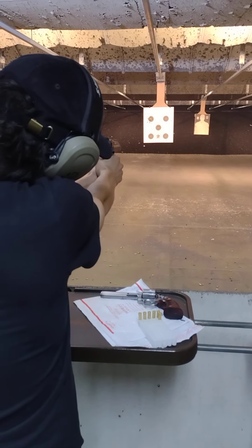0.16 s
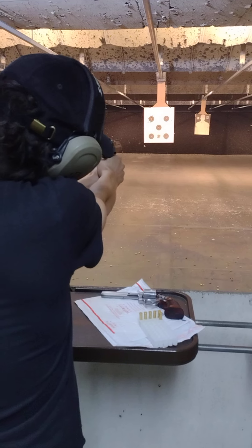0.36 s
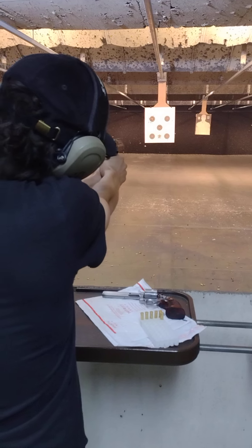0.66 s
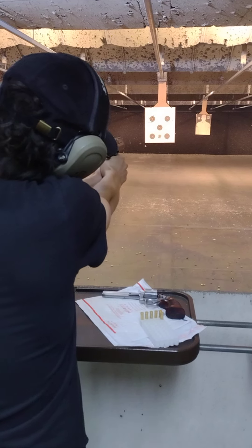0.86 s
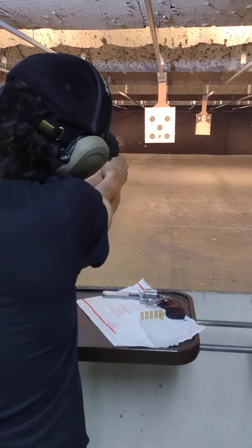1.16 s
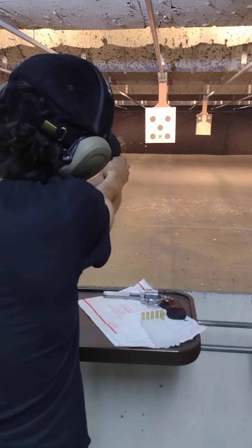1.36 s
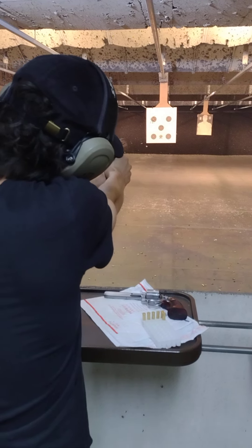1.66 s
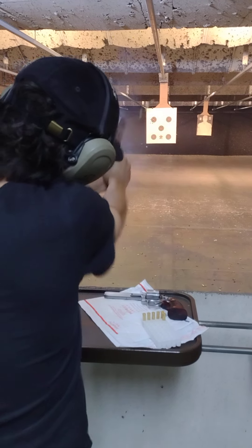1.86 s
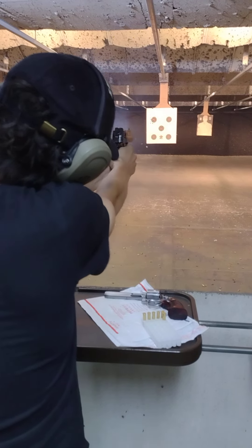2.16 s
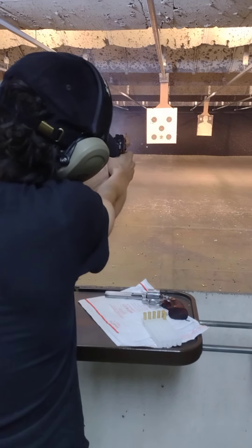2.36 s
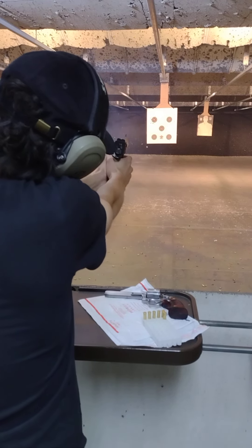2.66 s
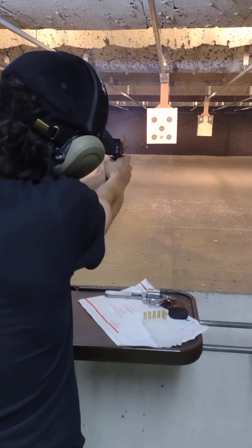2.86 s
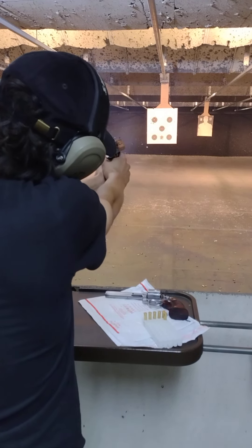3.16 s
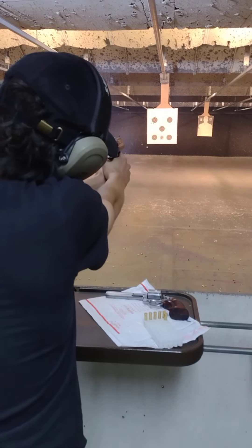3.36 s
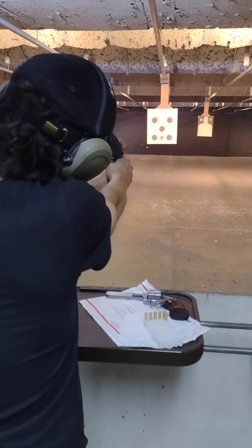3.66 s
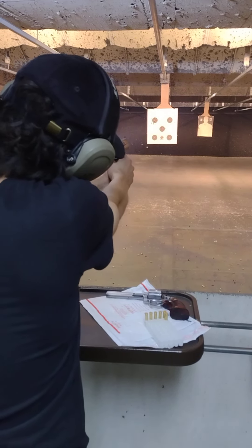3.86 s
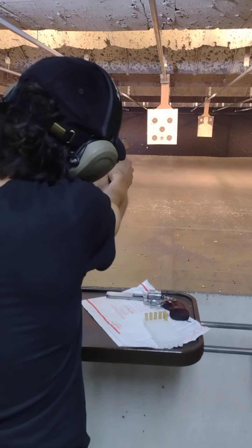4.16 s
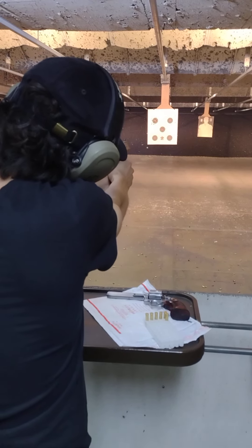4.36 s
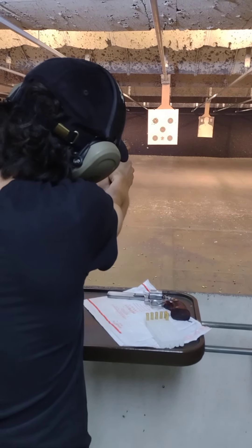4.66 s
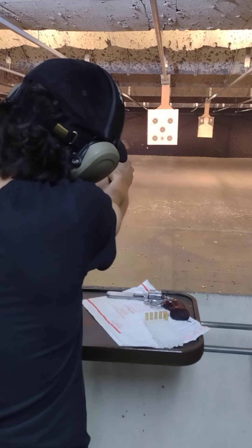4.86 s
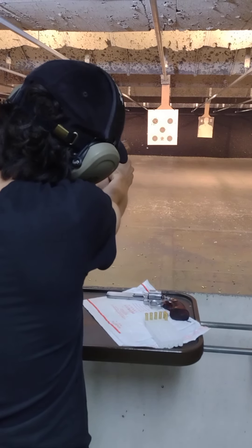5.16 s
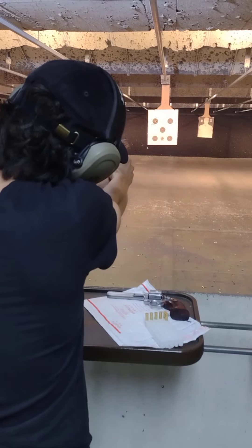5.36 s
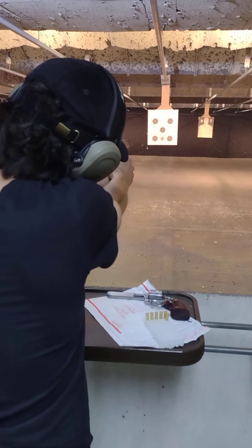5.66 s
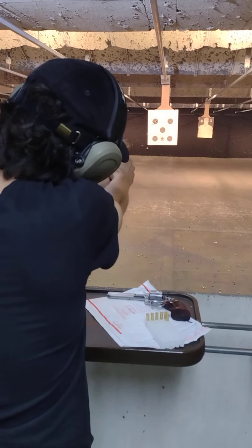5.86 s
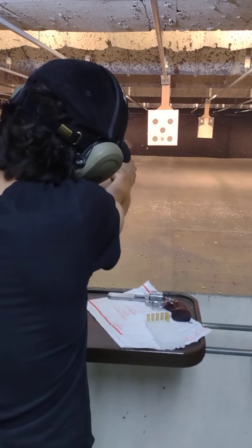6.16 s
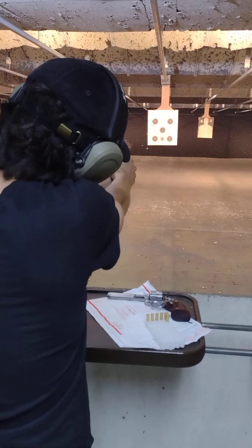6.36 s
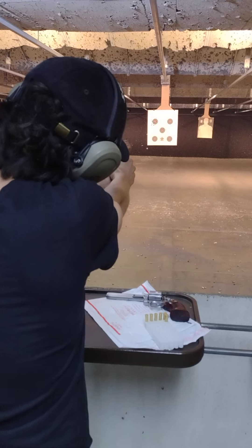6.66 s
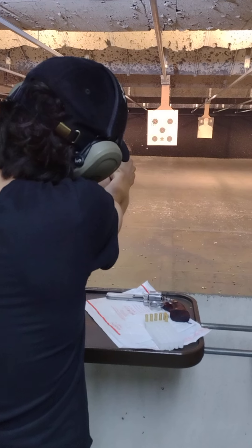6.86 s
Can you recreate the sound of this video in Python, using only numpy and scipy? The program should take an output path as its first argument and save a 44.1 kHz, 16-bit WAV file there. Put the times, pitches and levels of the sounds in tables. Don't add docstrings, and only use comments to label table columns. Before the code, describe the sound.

A long concrete indoor range, captured near the shooter in wide stereo. From 0 to 1.9 s there is low ventilation rumble, with small distant steel clinks around 0, 0.2, 0.4, 0.65, 1.0 and 1.7 s, a dull thud at 0.2 s and soft cloth and foot shifts from 1 s. At 1.94 s a bright, hissy handgun blast bursts out and holds as a dense roar, treble fading before hollow midrange ringing. Faint tinkles come near 2.5 s; a brass case strikes and rings at 2.8 s, rebounds at 3.35 s, with a short thud at 3.1 s. Harder, less bright shots hit at 3.64 and 5.18 s, each led by a tiny jolt and punchy boom. A low knock at 4.7 s and deep thud at 4.97 s intervene. The strongest shot comes at 6.79 s, its roar still sounding at the end. Peaks are squashed and tails swell forward.

```python
import sys
import numpy as np
from scipy import signal
from scipy.fft import rfft, irfft, next_fast_len
from scipy.io import wavfile
from scipy.ndimage import uniform_filter1d

SR = 44100
rng = np.random.default_rng(int(sys.argv[2]) if len(sys.argv) > 2 else 0)


def store_wav(level_fs):
    pcm = np.round(np.clip(np.atleast_2d(level_fs), -1, 1) * 32767)
    wavfile.write(sys.argv[1], SR, pcm.T.astype(np.int16))


def gain_from_db(level_db):
    decades = np.asarray(level_db, float) / 20
    return 10 ** decades


N = 309141
SIZE = next_fast_len(N)
BIN_HZ = np.arange(SIZE // 2 + 1) * SR / SIZE

# start_s, blast_db, extra_bass_db, extra_treble_db, bass_build_s
SHOTS = [
    (1.9408, 7, 3.5, 7, 0.17),
    (3.6406, 6, -6, -0.5, 0.11),
    (5.1756, 6.5, -7, -0.5, 0.082),
    (6.7937, 13, -10, -0.5, 0.012),
]
# frequency_hz, density_db (per Hz)
BLAST_SPECTRUM = [(25, -44.5), (60, -10.5), (130, 2.5), (300, 2.5), (600, 1), (1050, 2), (1500, -2.5),
                  (2500, -3.5), (3100, -4), (5000, -3.5), (7000, -10), (9000, -18), (12000, -19.5),
                  (15500, -19.5)]
# frequency_hz, width_hz, height_db
HALL_MODES = [(142, 35, 3), (231, 16, 2), (355, 40, 3), (572, 30, 6), (606, 16, 5), (758, 15, 3),
              (813, 20, 3), (996, 20, 5), (1082, 14, 6), (1336, 22, 3), (2300, 800, -2.5), (3150, 350, 2.5)]
# frequency_hz, correlation (no unit)
LIKENESS = [(60, 0.82), (150, 0.94), (380, 0.84), (950, 0.14), (2380, -0.0), (5980, 0), (15000, 0)]
# frequency_hz, left_minus_right_db
BALANCE_DB = [(60, 4), (110, 4), (200, -0.5), (380, 2), (700, -1.5), (1290, -1.0), (2380, -3.5), (4400, -1),
              (8120, 9), (15000, -2.5)]
# frequency_hz, t60_s, feed_s (how long the shock feeds the band)
HALL_DECAY = [(50, 2.64, 0.072), (151.5, 1.67, 0.079), (295, 1.534, 0.071), (556, 1.8, 0.017),
              (1000, 1.68, 0.0046), (2000, 1.66, 0.016), (3500, 0.91, 0.25), (5000, 0.59, 0.3),
              (7700, 0.32, 0.55), (12000, 0.26, 0.43)]
NEW_SHARE, NEW_PER_DB = 0.11, -0.43

# frequency_hz, density_db (per Hz)
LATE_SPECTRUM = [(60, -38.5), (300, -30), (600, -24.5), (1100, -25), (1500, -31.5), (2200, -34.5),
                 (3000, -39), (3500, -66), (5000, -62), (8000, -89)]
LATE_T60_S, LATE_RING = 4.03, 1.8
# frequency_hz, level_db, t60_s
STANDING = [(290, -16, 1.8), (570, -19, 2.4), (604, -24, 2.8), (813, -25, 2.6), (996, -24, 2.6),
            (1082, -24, 2.5)]
STANDING_DB, SPLIT_HZ = 0., 8

# start_s, jolt_db, polarity (push or pull), booth_boom_db
JOLTS = [
    (1.9383, -24, -1, -5),
    (3.6359, -7, 1, 13),
    (5.1717, -11, -1, 10),
    (6.7884, -11, -1, 14),
]
BOOM_LAG_S, BOOM_HZ, BOOM_T60_S, BOOM_SPREAD_HZ, BOOM_LR_DB = .0041, 930, .11, 300, -3

# start_s, knock_db, body_ring_db, rim_ring_db
BOUNCES = [
    (2.822, -23, -5, -26),
    (3.350, -33, -15, -36),
]
# frequency_hz, level_db, width_octaves, t60_s, left_minus_right_db
CASE_KNOCK = [(4420, -2, 1.2, 0.15, 3), (10500, -11, 1.8, 0.13, 7)]
# frequency_hz, level_db, t60_s, spread_hz
CASE_BODY = [(3130, -1, .09, 150), (3520, -4, .04, 200), (2750, -12, .07, 200), (4700, -16, .05, 500)]
# frequency_hz, level_db, t60_s, spread_hz
CASE_RIM = [(14895, 1, .25, 120), (6250, -20, .2, 70)]
CASE_RING_LAG_S, CASE_LR_DB, CASE_RISE_S = .0005, -3.5, .0035
# start_s, level_db, frequency_hz, width_octaves, left_minus_right_db
ROLL = [
    (2.861, -67, 6980, 0.82, 5),
    (3.025, -65.5, 13440, 0.55, -11),
]
ROLL_T60_S = 3.
# start_s, peak_db, pitch_hz, left_minus_right_db
TINKLES = [
    (2.52, -52, 12200, -6),
    (4.44, -63, 13400, -2),
    (4.44, -75, 12300, -3),
    (4.69, -72, 11150, 2),
    (5.62, -66, 10900, -12),
]
TINKLE_T60_S, TINKLE_SPREAD_HZ = .38, 65

# start_s, knock_db, knock_hz, ring_db, ring_hz
CLINKS = [
    (0.0, -59, 3000, -44, 2340),
    (0.228, -53, 5000, -30, 2440),
    (0.425, -59, 3500, -43, 2400),
    (0.645, -57, 3500, -48, 2400),
    (0.986, -59, 5000, -45, 2580),
    (1.689, -53.5, 5000, -42, 2540),
]
CLINK_OCTAVES, CLINK_T60_S, CLINK_LR_DB = 1.4, .28, 4
CLINK_TICK_DB, CLINK_TICK_HZ, CLINK_TICK_T60_S = -8, 11500, .16
CLINK_RING_T60_S, CLINK_SPREAD_HZ, CLINK_RING_LR_DB = .17, 300, -6

# start_s, level_db, centre_hz, t60_s, left_minus_right_db
THUDS = [
    (0.229, -43.5, 2060, 0.43, -4),
    (1.325, -60, 2190, 0.38, -2),
    (3.095, -20.5, 1630, 0.13, -0.5),
    (4.916, -53.5, 2000, .27, -4.5),
    (4.969, -24, 452, 0.59, 3.5),
    (5.145, -58.5, 2200, .57, -13),
]
THUD_OCTAVES, THUD_RISE_S = 2.1, .0015
CRACK_DB, CRACK_HZ, CRACK_OCTAVES, CRACK_T60_S = -37, 9000, 2.1, .16
# start_s, level_db, centre_hz, left_minus_right_db
TICKS = [
    (1.16, -60, 3600, 1.5),
    (2.479, -41, 13000, 1),
    (2.516, -42, 12000, 13),
    (3.258, -66, 7000, 9),
    (4.545, -71, 7000, 17),
    (4.705, -20.5, 1000, -4),
    (4.917, -73, 13000, 3),
    (4.969, -40, 2800, -10),
    (5.91, -64, 14000, 0),
    (6.095, -76, 14600, 4),
]
TICK_OCTAVES, TICK_T60_S = .55, .15
NEAR_RISE_S, FAR_RISE_S = .0005, .012

# middle_s, level_db, half_length_s
STEPS = [
    (0.998, -42, 0.045),
    (1.138, -46, 0.086),
    (1.27, -46, 0.036),
    (1.368, -47, 0.14),
    (1.56, -50, 0.1),
    (1.693, -46.5, 0.1),
    (1.908, -44.5, .07),
]
# frequency_hz, density_db (per Hz)
AIR_SPECTRUM = [(25, -26.5), (50, -18.5), (100, 3), (130, -2), (200, -4), (300, -14), (630, -21.5),
                (1000, -28), (1700, -31.5), (2450, -27), (3200, -39), (5000, -52), (8000, -60),
                (15000, -66)]
# frequency_hz, width_hz, height_db
DUCT_MODES = [(191, 5.5, 6), (404, 8.9, 1), (600, 25, 6), (2400, 180, -2.5)]
AIR_DB = -39.5

LIMIT_DB, RELEASE_DB_S, SENSE_S, SENSE_HZ = -12, 51.5, 0.0064, 354
SLOW_SHARE, SLOW_S = .12, .045
BASS_CUT_HZ, BASS_CUT_SHARE = 230, 0.22
CUTOFF_HZ = 16150


def shots():
    t = np.arange(N) / SR
    noises = np.array([diffuse(BLAST_SPECTRUM, HALL_MODES), diffuse(BLAST_SPECTRUM, HALL_MODES)])
    out, octave = np.zeros((2, N)), np.log2(BIN_HZ + 1)
    for centre in np.arange(4.5, 14.6, .5):
        hz = 2 ** centre
        band = np.cos(np.pi * np.clip(octave - centre, -.5, .5)) ** 2
        pattern, fresh = irfft(noises * band, SIZE)[..., :N]
        bass = 1 / (1 + (hz / 400) ** 2)
        treble = 1 / (1 + (3000 / hz) ** 2)
        t60 = at_hz(HALL_DECAY, hz)
        feed_s = abs(at_hz(np.array(HALL_DECAY)[:, ::2], hz))
        fading_s = np.hypot(t, feed_s) - feed_s
        tail = gain_from_db(-60 * fading_s / t60)
        for s, blast_db, bass_db, treble_db, build_s in SHOTS:
            i = round(s * SR)
            n = min(N - i, 2 * SR)
            build = 1 - np.exp(-t[:n] / (build_s * bass + 0.0012))
            share = np.clip((NEW_SHARE + NEW_PER_DB * treble_db) * (1 + hz / 2500), 0, 1)
            echoes = np.sqrt(1 - share) * pattern[:, :n] + np.sqrt(share) * fresh[:, i:i + n]
            level = gain_from_db(blast_db + bass_db * bass + treble_db * treble)
            out[:, i:i + n] += level * build * tail[:n] * echoes
    return out * gain_from_db(12.0)


def far_end():
    sharp_modes = [(hz, width / 2, LATE_RING * db) for hz, width, db in HALL_MODES]
    t, out = np.arange(2 * SR) / SR, np.zeros((2, N))
    pattern = irfft(diffuse(LATE_SPECTRUM, sharp_modes), SIZE)[:, :2 * SR]
    for s, blast_db, *_ in SHOTS:
        add(out, s, gain_from_db(blast_db + 14.0 - 60 * t / LATE_T60_S) * pattern)
    return out


def standing():
    out, t = np.zeros((2, N)), np.arange(2 * SR) / SR
    split_hz = SPLIT_HZ * np.array([-1, .1, .8])[:, None, None]
    for s, blast_db, *_ in SHOTS:
        for hz, db, t60 in STANDING:
            cycles = (hz + split_hz) * t + rng.random((3, 2, 1))
            trio = np.sin(2 * np.pi * cycles).sum(axis=0)
            add(out, s, gain_from_db(blast_db + STANDING_DB + db - 60 * t / t60) * trio)
    return out


def thumps():
    out, t = np.zeros((2, N)), np.arange(-200, 200) / SR
    high = signal.butter(2, 90, "high", fs=SR, output="sos")
    middle = signal.butter(2, [500, 2500], "band", fs=SR, output="sos")
    for s, peak_db, way, _ in JOLTS:
        jolt = 1.3 * way * np.sin(2 * np.pi * 580 * t) * np.exp(-(t / .0019) ** 2) * (t > 0)
        jolt = signal.sosfilt(high, jolt)
        noise = signal.sosfilt(middle, rng.standard_normal((2, 400)))
        shiver = .16 * rms_one(noise) * np.hanning(400)
        add(out, s + t[0], pan(gain_from_db(peak_db) * (jolt + shiver), 5))
    return out


def knocks():
    out, t = np.zeros((2, N)), np.arange(SR // 2) / SR
    for s, level_db, hz, octaves, t60, lr_db, rise_s in knock_rows():
        edges = np.clip(hz * 2.0 ** (np.array([-.5, .5]) * octaves), 50, .45 * SR)
        decay = gain_from_db(-60 * t / t60) + 0.56 * np.exp(-t / 0.0025)
        fade_out = np.minimum(5 - 10 * t, 1)
        shape = decay * (1 - np.exp(-t / rise_s)) * fade_out
        even_level = np.sqrt(SR / 2 / (edges[1] - edges[0]))
        burst = rng.standard_normal((2, len(t))) * shape * even_level
        burst = signal.sosfilt(signal.butter(3, edges, "band", fs=SR, output="sos"), burst)
        add(out, s, pan(gain_from_db(level_db) * burst, lr_db))
    return out


def knock_rows():
    rows = [(s, db, hz, TICK_OCTAVES, TICK_T60_S, lr, THUD_RISE_S) for s, db, hz, lr in TICKS]
    rows += [(s, db, hz, octaves, ROLL_T60_S, lr, 4 * FAR_RISE_S) for s, db, hz, octaves, lr in ROLL]
    for s, db, *_ in BOUNCES:
        rows += [(s, db + part_db, hz, *rest, NEAR_RISE_S) for hz, part_db, *rest in CASE_KNOCK]
    for s, db, hz, t60, lr in THUDS:
        rows += [(s, db, hz, THUD_OCTAVES, t60, lr, THUD_RISE_S),
                 (s, db + CRACK_DB, CRACK_HZ, CRACK_OCTAVES, CRACK_T60_S, 0, NEAR_RISE_S)]
    for s, db, hz, *_ in CLINKS:
        rows += [(s, db, hz, CLINK_OCTAVES, CLINK_T60_S, CLINK_LR_DB, FAR_RISE_S),
                 (s, db + CLINK_TICK_DB, CLINK_TICK_HZ, 1, CLINK_TICK_T60_S, 0, FAR_RISE_S)]
    return rows


def rings():
    out, t = np.zeros((2, N)), np.arange(SR // 2) / SR
    for s, hz, peak_db, t60, spread_hz, lr_db, rise_s in ring_rows():
        phase = rng.uniform(0, 2 * np.pi, (4, 2, 1)) * min(2 * rise_s / FAR_RISE_S + .1, 1)
        modes_hz = hz + spread_hz * np.array([-.5, -.1, .15, .45])[:, None, None]
        cluster = .5 * np.sin(2 * np.pi * modes_hz * t + phase).sum(axis=0)
        envelope = gain_from_db(peak_db - 60 * t / t60) * (1 - np.exp(-t / rise_s))
        add(out, s, pan(envelope * cluster, lr_db))
    return out


def ring_rows():
    rows = [(s, hz, db, TINKLE_T60_S, TINKLE_SPREAD_HZ, lr, FAR_RISE_S) for s, db, hz, lr in TINKLES]
    rows += [(s, hz, db, CLINK_RING_T60_S, CLINK_SPREAD_HZ, CLINK_RING_LR_DB, FAR_RISE_S)
             for s, _, _, db, hz in CLINKS]
    rows += [(s + BOOM_LAG_S, BOOM_HZ, db, BOOM_T60_S, BOOM_SPREAD_HZ, BOOM_LR_DB, NEAR_RISE_S)
             for s, *_, db in JOLTS]
    for s, _, body_db, rim_db in BOUNCES:
        for db, modes in ((body_db, CASE_BODY), (rim_db, CASE_RIM)):
            rows += [(s + CASE_RING_LAG_S, hz, db + part_db, t60, spread, CASE_LR_DB, CASE_RISE_S)
                     for hz, part_db, t60, spread in modes]
    return rows


def shuffle():
    t = np.arange(N) / SR
    swell = sum(gain_from_db(db) * np.clip(1 - np.abs(t - s) / half_s, 0, 1) ** 0.99 for s, db, half_s in STEPS)
    wander = rms_one(signal.lfilter([1], [1, -1.996, .996004], rng.standard_normal(N)))
    grains = rng.standard_normal((2, N)) * gain_from_db(3.5 * wander)
    band = signal.sosfilt(signal.butter(3, [300, 1100], "band", fs=SR, output="sos"), grains)
    return swell * rms_one(band)


def ventilation():
    return gain_from_db(AIR_DB + 1.0) * rms_one(irfft(diffuse(AIR_SPECTRUM, DUCT_MODES), SIZE)[:, :N])


def diffuse(spectrum, modes=()):
    mid, side = rfft(rng.standard_normal((2, SIZE)))
    alike = np.clip(at_hz(LIKENESS, BIN_HZ), -1, 1)
    bumps_db = sum(db / (1 + (2 * (BIN_HZ - hz) / width) ** 2) for hz, width, db in modes)
    tilt_db = at_hz(BALANCE_DB, BIN_HZ) * [[.5], [-.5]]
    gain = gain_from_db(at_hz(spectrum, BIN_HZ) + bumps_db + tilt_db)
    return gain * (np.sqrt(1 + alike) * mid + np.sqrt(1 - alike) * side * [[1], [-1]])


def at_hz(points, hz):
    p = np.array(points)
    return np.interp(np.log(np.maximum(hz, 1)), np.log(p[:, 0]), p[:, 1])


def rms_one(x):
    return x / np.sqrt(np.mean(x ** 2))


def pan(x, lr_db):
    return x * gain_from_db(np.array([[lr_db / 2], [-lr_db / 2]]))


def add(out, s, x):
    i = round(s * SR)
    out[:, i:i + x.shape[1]] += x[:, :N - i]


def scene():
    blasts = shots() + far_end() + standing() + thumps()
    objects = knocks() + rings()
    return blasts + objects + shuffle() + ventilation()


def roll_off(x):
    return signal.sosfilt(signal.butter(12, 16520, fs=SR, output="sos"), x)


def record(dry):
    heard = signal.sosfilt(signal.butter(1, SENSE_HZ, "high", fs=SR, output="sos"), dry)
    power = uniform_filter1d(np.mean(heard ** 2, axis=0), size=max(round(SENSE_S * SR), 1))
    over_db = np.maximum(10 * np.log10(np.abs(power) + 1e-12) - LIMIT_DB, 0)
    fall_db = RELEASE_DB_S * np.arange(N) / SR
    held_db = uniform_filter1d(np.maximum.accumulate(over_db + fall_db) - fall_db, size=44)
    r = np.exp(-1 / (SLOW_S * SR))
    late_db = signal.lfilter([1 - r], [1, -r], held_db)
    bass = signal.sosfilt(signal.butter(1, BASS_CUT_HZ, fs=SR, output="sos"), dry)
    thinned = dry - bass * (1 - gain_from_db(-BASS_CUT_SHARE * late_db))
    limited = thinned * gain_from_db(-(1 - SLOW_SHARE) * held_db - SLOW_SHARE * late_db)
    rounded = limited / (1 + np.abs(limited) ** 6) ** (1 / 6)
    mix = signal.sosfilt(signal.cheby2(12, 40, CUTOFF_HZ, fs=SR, output="sos"), rounded)
    return roll_off(mix)


dry = scene()
out = record(dry)
store_wav(out)
```